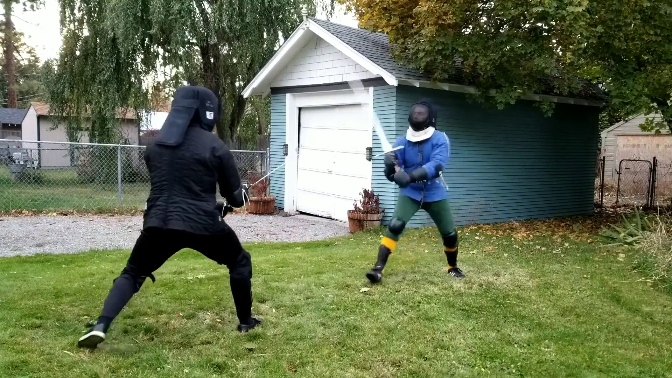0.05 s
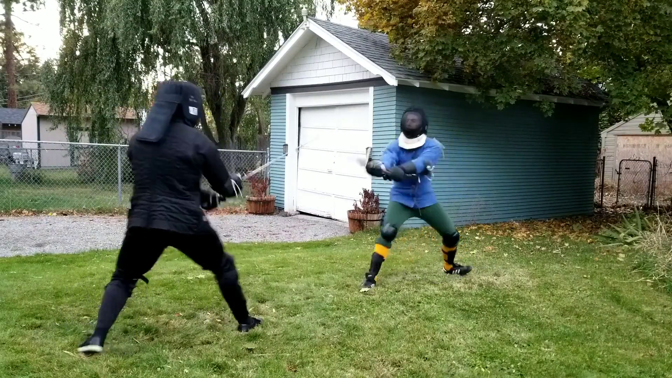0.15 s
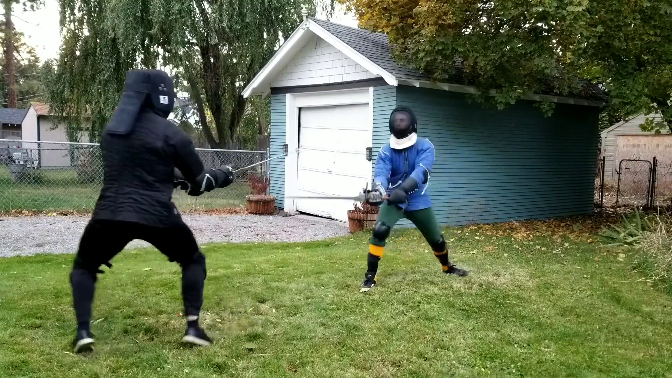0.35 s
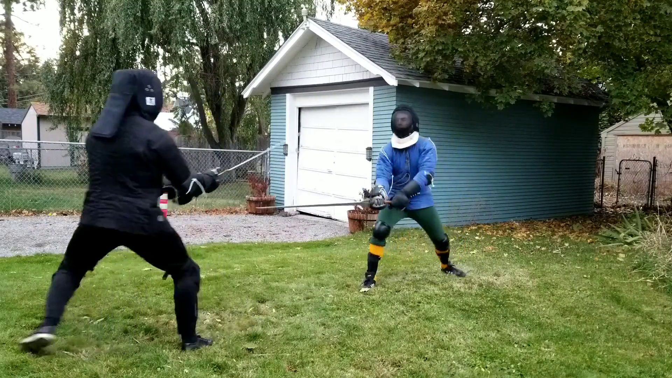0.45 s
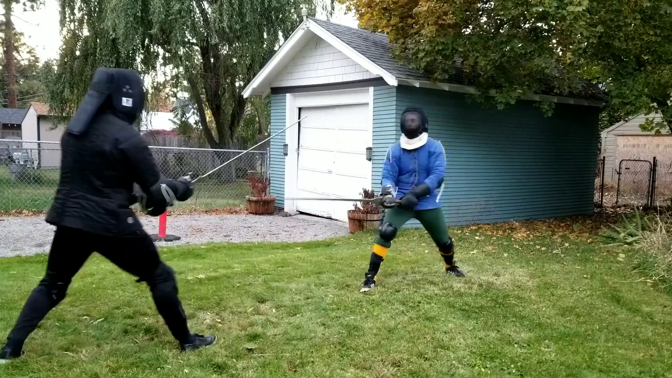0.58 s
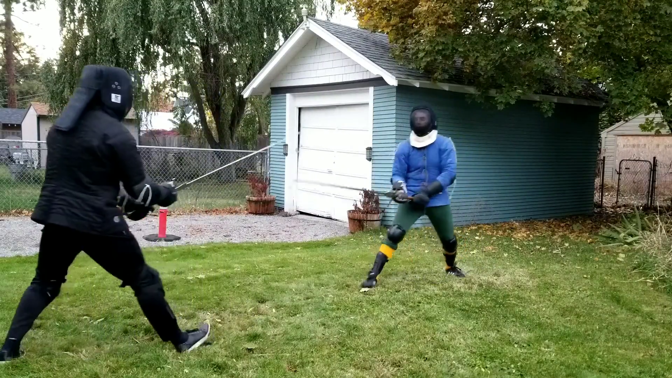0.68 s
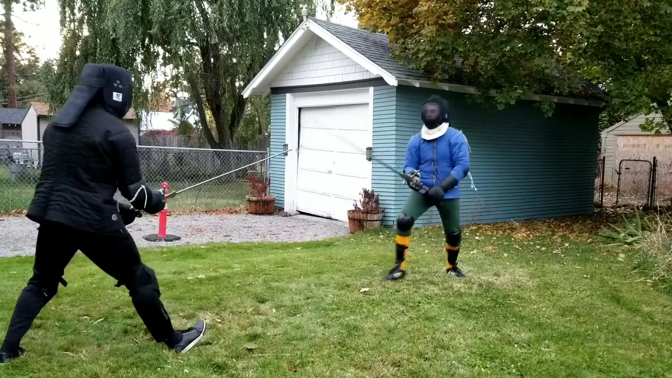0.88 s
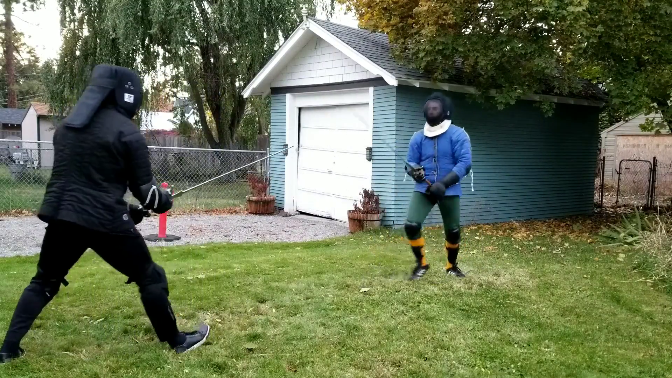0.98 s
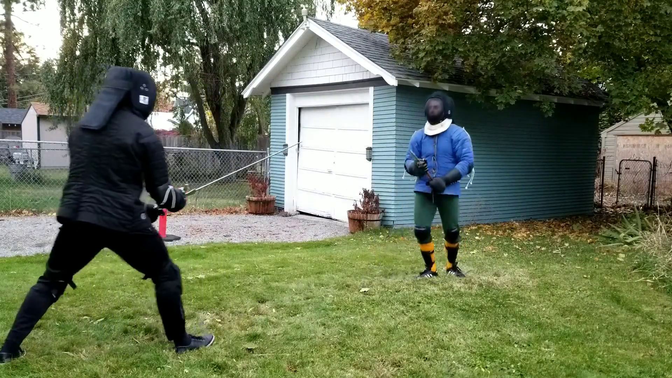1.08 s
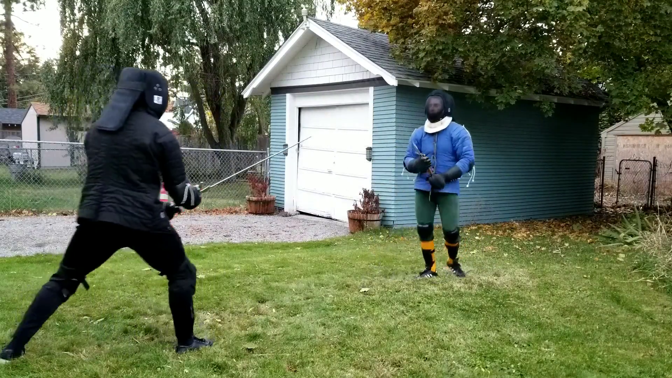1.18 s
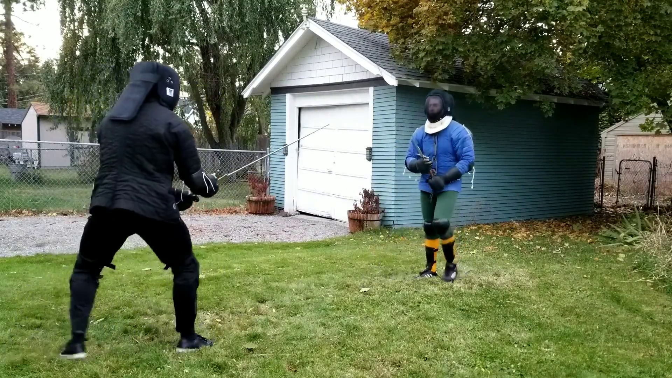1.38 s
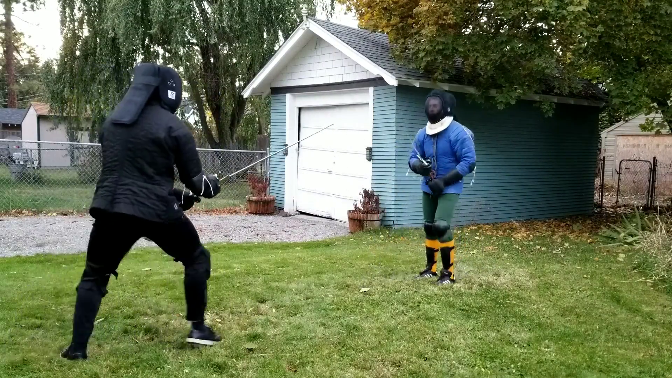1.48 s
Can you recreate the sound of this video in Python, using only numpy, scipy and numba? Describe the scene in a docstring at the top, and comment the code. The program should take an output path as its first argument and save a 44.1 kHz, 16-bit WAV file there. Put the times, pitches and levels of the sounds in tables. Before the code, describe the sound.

A single bright clink of steel sword blades outdoors, with low wind and traffic behind.

```python
"""Two steel longswords clash once in a back yard. The edges chatter together for about 30 ms, each contact
feeding the modes of both blades: a dense, short crash with clear tones ringing through it, scattered by a
garage wall, fence and trees. Distant traffic and low wind run underneath, with soft footfalls and a few
faint ticks of gear. A limiter squeezes the blow; an automatic gain control ducks under it and stays down."""
import sys
import numpy as np
from scipy import signal
from scipy.fft import rfft, irfft
from scipy.io import wavfile
from numba import njit

SR = 44100
rng = np.random.default_rng(int(sys.argv[2]) if len(sys.argv) > 2 else 0)


def generate_wav(signal):
    """Clip the signal to [-1, 1] and save it as 16-bit WAV at the path in sys.argv[1]."""
    frames = np.transpose(np.atleast_2d(signal))
    scaled = np.clip(frames, -1, 1) * 32767
    pcm = np.round(scaled).astype(np.int16)
    wavfile.write(sys.argv[1], SR, pcm)


N = 66150
YARD_DELAY_S = .008  # travel time of the first reflections


def undb(db):
    """Decibels to gain."""
    return 10 ** (np.asarray(db) / 20)


def unit(x):
    """Scale to an rms of 1."""
    return x / np.sqrt(np.mean(x ** 2))


def pan(db):
    """Left and right gains for a left-minus-right level difference."""
    return undb(np.array([[db], [-db]]) / 2)


def gain_at(hz, points):
    """Gain of a (Hz, dB) curve at the given frequencies."""
    f, db = np.array(points).T
    return undb(np.interp(np.log(hz + 1), np.log(f), db))


def bins():
    """Frequencies of the spectrum of a whole signal."""
    return np.arange(N // 2 + 1) * SR / N


def noise(gain):
    """Noise of rms 1 with the given gain at each frequency."""
    return unit(irfft(rfft(rng.standard_normal(N)) * gain, N))


def wide_noise(gain):
    """Independent left and right noises of the same colour."""
    return np.array([noise(gain), noise(gain)])


def bell(hz, octaves):
    """A smooth band around a centre frequency."""
    return np.exp(-.5 * (np.log2((bins() + 1) / hz) / octaves) ** 2)


def fade(start, tau):
    """Exponential decay from a start time, with time constant tau in seconds."""
    age = np.arange(N) / SR - start
    return (age >= 0) * np.exp(-np.maximum(age, 0) / tau)


@njit
def follow(x, attack_s, release_s):
    """Envelope follower with separate rise and fall times."""
    out, level = np.empty(len(x)), 0.
    for i in range(len(x)):
        level += (x[i] - level) / (SR * (attack_s if x[i] > level else release_s))
        out[i] = level
    return out


def traffic():
    """A wash of far traffic, narrow in the bass and wide in the treble, with a low drone that swells."""
    # Each row: frequency in Hz, relative level of the wash in dB.
    spectrum = [(60, -6), (150, -3.5), (240, 2.5), (330, -2), (450, -7), (620, -4), (1050, -2.5),
                (1500, -9.5), (2100, -17.5), (2900, -26.5), (5400, -35), (10000, -42), (13000, -38),
                (14500, -37)]
    # Each row: time in seconds, level of the drone in dB.
    swell = [(0, -53), (.9, -52.5), (1.08, -46), (1.17, -41), (1.3, -48.5), (1.45, -45.5)]
    hz, t = bins(), np.arange(N) / SR
    bass_cut_hz, wide_above_hz = 60, 627
    colour = gain_at(hz, spectrum) * hz / (hz + bass_cut_hz)
    mid, side = rfft(rng.standard_normal((2, N)))
    side = side * hz / np.hypot(hz, wide_above_hz)
    wash = unit(irfft(np.array([mid + side, mid - side]) * colour, N))
    drone = noise(bell(hz=221.7, octaves=.13)) * undb(np.interp(t, *np.array(swell).T))
    return undb(-40) * wash * pan(-3.5) + drone * pan(-3)


def wind():
    """A steady low rumble of wind, a little to the right."""
    # Each row: frequency in Hz, relative level of the rumble in dB.
    spectrum = [(20, -25), (33, -21.5), (47, 6.5), (75, -3.5), (120, -5), (185, -6), (280, -16.5),
                (500, -21.5)]
    hz, top_hz = bins(), 500
    return undb(-39) * noise(gain_at(hz, spectrum) * (hz < top_hz)) * pan(-3)


def footfalls():
    """Feet land on the lawn in dull thuds with a soft attack."""
    # Each row: start in seconds, relative level in dB, centre of the thud in Hz.
    steps = [(0.058, -36, 53), (.208, -33.5, 123), (0.552, -32, 60.2), (0.742, -35, 60),
             (0.959, -34.5, 71.2)]
    decay_s, out = .025, 0
    for start, db, hz in steps:
        envelope = fade(start, decay_s) - fade(start, decay_s / 5)
        out += 2 * undb(db) * noise(bell(hz, octaves=.6)) * envelope
    return out * pan(-2)


def gear_ticks():
    """The fencers' gear ticks faintly in tiny bursts of bright noise."""
    # Each row: start in seconds, level in dB, centre of the tick in Hz.
    ticks = [(0.642, -54, 3200), (0.7154, -53, 4970), (0.778, -60, 7000)]
    out = 0
    for start, db, hz in ticks:
        out += undb(db) * wide_noise(bell(hz, octaves=.72)) * fade(start, tau=.0061)
    return out * pan(-2)


def chatter_envelope(t60):
    """Amplitude of a resonance that gains energy at every contact of the edges and then dies away."""
    # Each row: time of the contact in seconds, relative strength in dB.
    contacts = [(0.2361, -20.5), (0.2418, -11), (0.2475, -11), (0.2504, -8.5), (0.259, -11.5), (0.2614, 1)]
    slide_s = .0024  # the edges slide on after each contact
    blows = np.zeros(N)
    for start, db in contacts:
        blows[int(start * SR)] += undb(db) ** 2
    slide = np.exp(-1 / (slide_s * SR))
    power = signal.lfilter([1 - slide], [1, -slide], blows + 1e-18)
    retained = np.exp(-2 * np.log(1000) / (t60 * SR))
    energy = signal.lfilter([1], [1, -retained], power)
    return np.sqrt(energy)


def yard_tail(clusters):
    """Fence and foliage scatter the crash into a short diffuse tail whose treble dies first."""
    # Each row: frequency in Hz, relative level of the scattered sound in dB.
    spectrum = [(1000, -10.5), (2200, -9.5), (3000, 0), (4500, -2), (6000, -1), (8500, 0), (11000, -6.5),
                (14500, 1.5)]
    centres_hz = np.geomspace(1200, 13000, 9)
    weights = np.sqrt(centres_hz) * gain_at(centres_hz, spectrum)
    tail = 0
    for hz, weight in zip(centres_hz, weights / np.linalg.norm(weights)):
        band = wide_noise(clusters * bell(hz, octaves=.25))
        tail += weight * band * chatter_envelope(t60=.51 * (hz / 3000) ** -.34)
    return undb(-21) * np.roll(tail, int(YARD_DELAY_S * SR), axis=1)


def wall_echo(tones):
    """The walls return the blade tones as a brief, smeared reflection."""
    t60_s = .19
    response = rng.standard_normal((2, N)) * fade(YARD_DELAY_S, t60_s / np.log(1000))
    response /= np.linalg.norm(response[0])
    return undb(-14) * signal.fftconvolve(tones, response, axes=1)[:, :N]


def mode_clusters(spacing_hz=45, spread_db=4):
    """Steel modes bunch unevenly, putting random peaks and dips in the spectrum."""
    spots = np.arange(0, SR / 2, spacing_hz)
    return undb(spread_db * np.interp(bins(), spots, rng.standard_normal(len(spots))))


def crash(clusters):
    """Quickly damped steel modes, too close to tell apart, make the crash; the highest lean left."""
    # Each row: frequency in Hz, relative level of the dense modes in dB.
    spectrum = [(1300, -45.5), (1900, -9.5), (2400, -12), (2800, 4), (3400, -4.5), (4100, -0.5),
                (4600, -4.5), (5500, 0), (6700, 5), (7200, -0.5), (8000, 2), (10000, -0.5), (14500, -4)]
    lowest_hz, centred_hz, pan_db_per_octave = 1300, 5040, 3
    hz = bins()
    lean = undb(pan_db_per_octave * np.log2((hz + 1) / centred_hz) / 2)
    colour = clusters * gain_at(hz, spectrum) * (hz > lowest_hz) * np.array([lean, 1 / lean])
    dense_modes = unit(irfft(rfft(rng.standard_normal((2, N))) * colour, N))
    return undb(9.5) * dense_modes * chatter_envelope(t60=.065)


def ring(modes):
    """The clear tones of a blade, one sine a mode, slightly out of phase between left and right."""
    t, out = np.arange(N) / SR, 0
    for hz, db, t60, pan_db in modes:
        phase = rng.uniform(0, 2 * np.pi) + rng.standard_normal((2, 1)) / 2
        out += undb(db) * pan(pan_db) * chatter_envelope(t60) * np.sin(2 * np.pi * hz * t + phase)
    return out


def sword_clash():
    """Steel meets steel: both blades ring through the crash and the yard answers."""
    # Blade modes. Each row: pitch in Hz, relative level in dB, t60 in seconds, left minus right in dB.
    striking_blade = [(2929, -16, .12, -12), (2948, -23, .12, -8), (3605, -18, .08, -5),
                      (3908, -20, .09, -4), (4170, -17, .11, 0), (4215, -19, .11, -9), (5110, -11, .08, -2),
                      (5372, -18, .08, 2), (6362, -19, .1, 9), (6819, -13, .09, -4), (7579, -18, .08, 6),
                      (8105, -13, .09, 7), (9764, -17, .09, 4), (10971, -15, .06, 9), (12616, -12, .06, 7)]  # loud and short
    parrying_blade = [(2990, -29, .26, 2), (3224, -32, .42, 4), (3289, -40, .4, -7), (3549, -32, .4, -7),
                      (3588, -32, .52, -4), (3755, -40, .42, -7), (4099, -36, .36, -3), (5745, -31, .27, 5),
                      (6325, -36, .24, 2), (7785, -34, .25, 5), (8055, -32, .24, 6), (8530, -35, .2, 2),
                      (10810, -35, .18, 4), (12853, -29, .16, 7)]  # quieter, sings on
    bending_modes = [(521.8, -28.5, 0.073, -1.5), (595.4, -20.5, 0.022, 2), (833, -31.5, .07, -10.5),
                     (1085, -29.5, 0.036, -10.5), (1425, -27.5, 0.05, -6), (1705, -34.5, 0.044, 4),
                     (1845, -29.5, 0.043, -17), (2250, -33.5, 0.12, -6.5)]  # the low body of both blades
    tones = undb(2.5) * ring(striking_blade) + undb(-2) * ring(parrying_blade)
    tones += undb(7) * ring(bending_modes)
    echo = wall_echo(tones)
    clusters = mode_clusters()
    return tones + echo + crash(clusters) + yard_tail(clusters)


def scene():
    """The clash and the fencers' movements over a bed of traffic and wind."""
    return sword_clash() + footfalls() + gear_ticks() + traffic() + wind()


def record(dry):
    """Low cut, a fast limiter on the blow, a gain control that ducks and stays down, then a top cut."""
    low_cut_hz, top_cut_hz = 38, 14600
    threshold_db, limit_slope = -12, .62
    duck_db, knee_db = -9, -20
    dry = signal.sosfilt(signal.butter(4, low_cut_hz, "high", fs=SR, output="sos"), dry)
    level = np.sqrt(np.mean(dry ** 2, axis=0))
    limit_drive = follow(level, attack_s=.001, release_s=.005) / undb(threshold_db)
    limiter = np.maximum(limit_drive, 1) ** -limit_slope
    duck_drive = (follow(level, attack_s=.0032, release_s=6) / undb(knee_db)) ** 2
    duck = undb(duck_db * duck_drive / (1 + duck_drive))
    top_cut = signal.ellip(10, .2, 70, top_cut_hz, fs=SR, output="sos")
    return signal.sosfilt(top_cut, dry * limiter * duck)


dry = scene()
out = record(dry)
generate_wav(out)
```